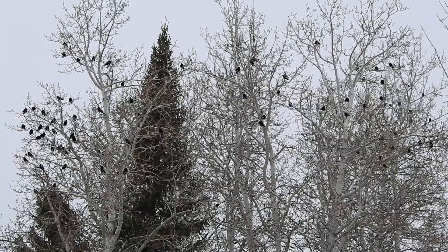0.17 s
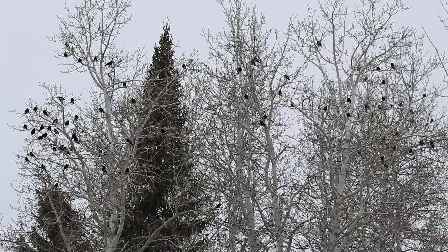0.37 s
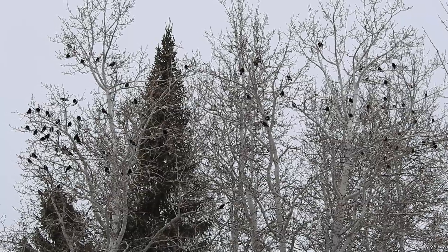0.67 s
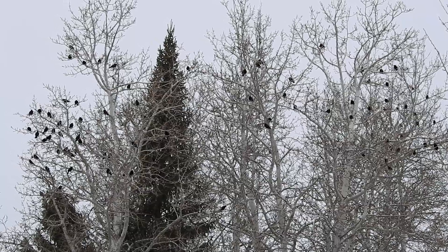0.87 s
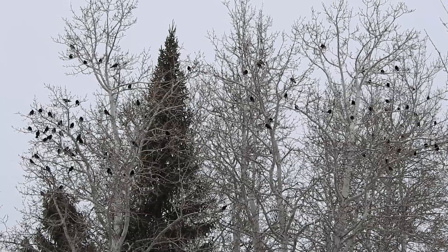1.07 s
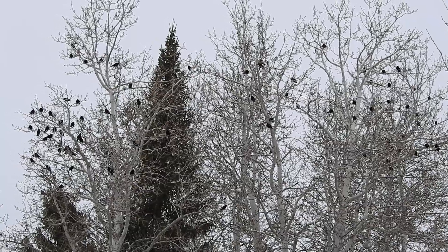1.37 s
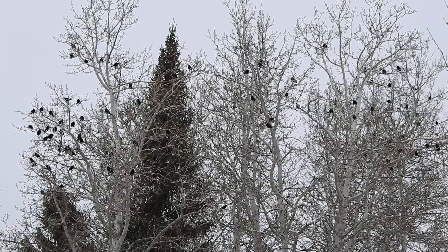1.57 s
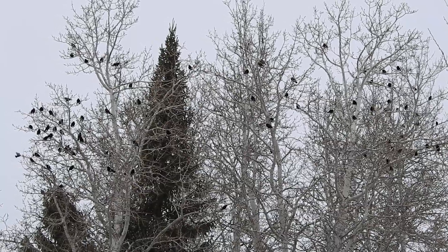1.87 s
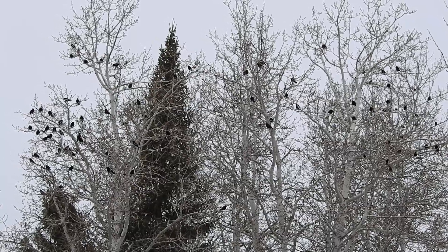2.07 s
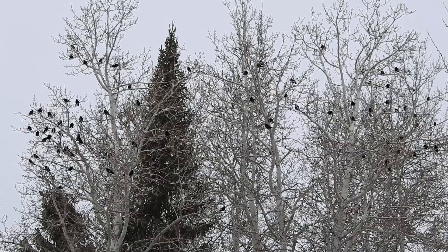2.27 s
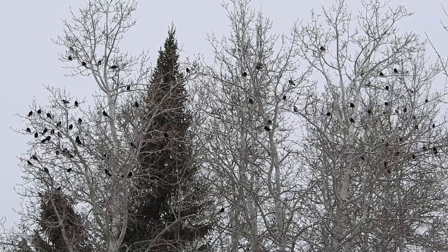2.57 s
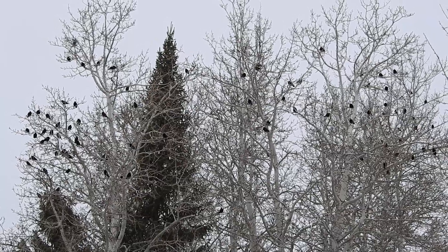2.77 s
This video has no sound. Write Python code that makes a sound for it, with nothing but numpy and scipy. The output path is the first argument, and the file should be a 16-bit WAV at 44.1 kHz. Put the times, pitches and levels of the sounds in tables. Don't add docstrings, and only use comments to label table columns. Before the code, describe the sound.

A dense flock of blackbirds chatters, whistles and trills in bare trees over faint traffic hum.

```python
import sys
import numpy as np
from scipy import signal
from scipy.fft import rfft, irfft
from scipy.io import wavfile
from scipy.ndimage import uniform_filter1d

SR = 44100
rng = np.random.default_rng(int(sys.argv[2]) if len(sys.argv) > 2 else 0)


def amplitude_ratio(level_db):
    exponent = np.asarray(level_db, float) / 20
    return 10 ** exponent


def waveform_to_disk(signal):
    frames = np.transpose(np.atleast_2d(signal))
    scaled = np.clip(frames, -1, 1) * 32767
    samples = np.round(scaled).astype(np.int16)
    wavfile.write(sys.argv[1], SR, samples)


N = 129213

# time_s, pitch_hz, level_db
SLUR_PATHS = [
    [(.267, 6640, -24), (.276, 4623, -27.5), (.305, 3860, -30), (.34, 3445, -33.5), (.42, 3230, -27.5),
     (.45, 3170, -27)],
    [(.326, 4400, -33), (.36, 4130, -25.5), (.42, 3945, -34.5), (.486, 3680, -31), (.567, 3332, -28.5),
     (.70, 3196, -35.5)],
    [(.686, 4820, -26), (.70, 4670, -33.5), (.742, 3076, -26), (.80, 2980, -32)],
    [(.785, 4330, -28), (.825, 3730, -28.5), (.855, 3174, -31), (.905, 3130, -28)],
    [(.905, 3780, -23.5), (.945, 3240, -30), (.986, 2957, -29), (1.06, 2770, -38.5)],
    [(.915, 3600, -35.5), (1.01, 3474, -26), (1.07, 3210, -29), (1.145, 3110, -36.5)],
    [(2.125, 3550, -33), (2.17, 3092, -36), (2.23, 2970, -38), (2.34, 2740, -39.5)],
    [(2.607, 3650, -29), (2.67, 3337, -32.5), (2.76, 3283, -32.5)],
    [(2.644, 5555, -56.5), (2.665, 5680, -26.5), (2.715, 4464, -27), (2.79, 4046, -37), (2.93, 3830, -35)],
    [(2.80, 3860, -32), (2.845, 3050, -36), (2.92, 2920, -33)],
]
# time_s, pitch_hz, level_db
THIN_WHISTLE_PATHS = [
    [(.574, 8290, -51), (.70, 7700, -49), (.83, 7040, -50)],
    [(.85, 7760, -57), (.89, 7050, -47), (.93, 7880, -48)],
    [(1.225, 6370, -57), (1.26, 7060, -46), (1.325, 7440, -37.5)],
    [(1.328, 6800, -39), (1.365, 7650, -41), (1.49, 7770, -37), (1.515, 8080, -45)],
    [(1.56, 7270, -60), (1.62, 7480, -47), (1.69, 7100, -56)],
    [(2.02, 7030, -41.5), (2.16, 7510, -41), (2.297, 7930, -47)],
    [(2.794, 6250, -40), (2.86, 7310, -41), (2.93, 7460, -39)],
]
# start_s, length_s, from_hz, to_hz, level_db
PIPED_NOTES = [(.088, .04, 1566, 1467, -41), (.137, 0.064, 1380, 1335, -44),
               (0.229, 0.035, 2356, 2296, -34), (0.3, 0.14, 1408, 1410, -42.5),
               (0.36, .12, 1702, 1690, -46), (0.236, .055, 1376, 1274, -47),
               (0.701, 0.068, 1370, 1323, -46.5), (0.801, 0.046, 1280, 1287, -48.5),
               (0.711, 0.021, 2030, 2190, -35.5), (.905, 0.04, 1393, 1372, -46),
               (.963, .03, 2270, 2040, -32), (1.0, 0.095, 2150, 2180, -34), (1.071, 0.045, 1440, 1420, -48),
               (1.125, 0.049, 1510, 1580, -47.5), (1.188, 0.023, 2277, 2400, -33.5),
               (1.298, .11, 1430, 1353, -49), (1.354, 0.038, 1604, 1580, -46.5),
               (1.408, 0.065, 2233, 2167, -39), (1.474, .02, 2220, 2300, -44),
               (1.735, .05, 1345, 1444, -47.5), (1.794, 0.034, 1880, 1864, -41),
               (1.835, .10, 1920, 1910, -50), (1.96, 0.015, 2227, 2166, -31),
               (1.986, 0.027, 1767, 1890, -38.5), (2.167, 0.088, 1685, 1630, -44.5),
               (2.229, 0.12, 1290, 1318, -48), (2.234, .11, 1020, 1042, -47.5),
               (2.30, .02, 2140, 2180, -39), (2.421, 0.04, 2123, 2160, -37),
               (2.487, 0.024, 2096, 2130, -35.5), (2.437, 0.04, 1677, 1714, -43),
               (2.548, 0.085, 1355, 1438, -43), (2.714, .018, 2260, 2250, -30),
               (2.812, .02, 1834, 1850, -37.5), (2.82, 0.033, 1654, 1684, -43.5)]
# start_s, length_s, from_hz, to_hz, level_db
SHORT_CHIRPS = [(0.063, 0.017, 4530, 4630, -26.5), (0.186, 0.0094, 3255, 3320, -30),
                (.11, 0.027, 3120, 3360, -35), (.25, 0.015, 3085, 3190, -29),
                (.082, 0.0073, 3500, 3330, -25.5), (.054, .17, 4990, 4900, -41.5),
                (.065, 0.13, 2480, 2567, -41.5), (.11, .017, 6440, 6470, -43),
                (0.676, 0.011, 6000, 6070, -28.5), (.722, 0.0088, 4720, 4640, -23),
                (0.76, 0.007, 4740, 4700, -25), (1.16, 0.052, 2750, 2776, -39),
                (1.256, 0.012, 3170, 3020, -29.5), (1.85, 0.073, 5696, 5750, -41),
                (2.03, 0.028, 3750, 3440, -29.5), (2.05, 0.057, 3200, 2980, -35),
                (2.455, .035, 3500, 3150, -35), (2.608, 0.012, 4740, 4760, -31)]
# start_s, length_s, pitch_hz, level_db
TRILL_RUNS = [
    (0.056, 0.073, 4900, -27.5),
    (0.642, .03, 4670, -32.5),
    (1.122, 0.53, 4700, -34.5),
]
# start_s, peak_db, pitch_hz
NEAREST_TRILL_NOTES = [(1.9809, -21.5, 4840), (2.0055, -16.5, 4600), (2.0246, -19, 4620),
                       (2.0494, -21, 4700), (2.0646, -21, 4710), (2.117, -20, 5210), (2.139, -22, 4830),
                       (2.1625, -20.5, 4970), (2.1874, -22, 5000), (2.2125, -19, 4770),
                       (2.239, -17.5, 4690), (2.265, -17, 4670), (2.2932, -20, 4700), (2.3204, -16.5, 4720),
                       (2.3491, -25, 4960), (2.3614, -22, 4840), (2.3774, -31, 4970), (2.4039, -27, 4830),
                       (2.4296, -22, 4810), (2.4842, -21, 4720)]
# start_s, length_s, top_hz, level_db
ARCHED_CHIRPS = [
    (0.786, 0.038, 5820, -34),
    (.812, .014, 5750, -40),
    (0.92, 0.019, 5680, -25.5),
    (0.949, 0.013, 5670, -34),
    (0.995, 0.025, 5680, -31.5),
    (1.028, 0.013, 5100, -33),
]
# start_s, pitch_hz, level_db
HARSH_CHUCKS = [
    (1.544, 3530, -26),
    (1.692, 3550, -29.5),
    (1.839, 3460, -28),
    (1.995, 7230, -42.5),
]
# middle_s, top_hz
QUICK_TICKS = [(0.162, 6000), (0.43, 7550), (0.759, 6400), (0.89, 5900), (0.911, 7730), (1.008, 5900),
               (1.525, 6030), (1.649, 6070), (1.031, 5870), (2.09, 6700), (2.255, 6720), (2.354, 6340),
               (2.478, 7100), (2.53, 6900), (2.73, 5900), (2.777, 5860)]
# pitch_hz, level_db
AIR_LOSS = [(11500, 0), (15000, -16)]
# pitch_hz, level_db (per Hz)
FLOCK_COLOUR = [(900, -20), (1830, -11.5), (2550, -3.5), (3150, 2), (3920, -4), (4760, -2.5), (6470, -10.5),
                (8700, -33), (12000, -87.5)]
# time_s, level_db
FLOCK_EFFORT = [
    (0.062, -30.5),
    (0.501, -27.5),
    (0.949, -24.5),
    (1.2, -30.5),
    (1.8, -29.5),
    (2.049, -27.5),
    (2.551, -29),
    (2.92, -26),
]
# pitch_hz, level_db (per Hz)
TRAFFIC_COLOUR = [(30, -50), (48, -11.5), (80, -8.5), (213, 0.5), (635, -7.5), (1300, -18.5), (2600, -49.5)]
# pitch_hz, level_db (per Hz)
HISS_COLOUR = [(9000, -5.5), (16000, -24)]
# pitch_hz, level_db (side minus middle)
STEREO_WIDTH = [(60, -10.5), (210, -25), (720, -14.5), (2470, -13), (12000, -0.5)]

EDGE_S = 0.006
TICK_S = 0.0055


def near_birds():
    mix = np.zeros((2, N))
    slurs(mix)
    pipes_and_chirps(mix)
    trills(mix)
    nearest_trill(mix)
    arches(mix)
    chucks(mix)
    for middle_s, top_hz in QUICK_TICKS:
        add(mix, middle_s - TICK_S, tick(top_hz, -31.5))
    return colour(mix, AIR_LOSS)


def slurs(mix):
    for path in SLUR_PATHS + THIN_WHISTLE_PATHS:
        time_s, hz, db = np.transpose(path)
        t = np.arange(time_s[0], time_s[-1] + EDGE_S, 1 / SR)
        pitch = uniform_filter1d(np.interp(t, time_s, hz), size=300, mode="nearest")
        has_overtones = hz[0] < 6650 and hz[-1] < 5000
        add(mix, time_s[0] - EDGE_S / 2, whistle(pitch, np.interp(t, time_s, db), has_overtones))


def pipes_and_chirps(mix):
    for start_s, length_s, from_hz, to_hz, db in PIPED_NOTES + SHORT_CHIRPS:
        add(mix, start_s - EDGE_S / 2, note(length_s, from_hz, to_hz, db))


def trills(mix):
    beats_per_s, open_share = 36.4, 0.62
    for start_s, length_s, hz, db in TRILL_RUNS:
        which, beat = np.divmod(np.arange(0, length_s, 1 / SR) * beats_per_s, 1)
        shift, slant, size = rng.standard_normal((20, 3))[which.astype(int)].T
        gate = np.sin(np.pi * np.clip(beat / open_share, 0, 1))
        pitch = hz * (1 + 0.012 * shift + 0.07 * slant * (beat / open_share - 0.5))
        add(mix, start_s, gate * whistle(pitch, db + 0.5 + 2 * size))


def nearest_trill(mix):
    slants = 0.038 * rng.uniform(-1.1, 1, len(NEAREST_TRILL_NOTES))
    for (start_s, peak_db, hz), slant in zip(NEAREST_TRILL_NOTES, slants):
        sound = note(0.011, hz * (1 - slant), hz * (1 + slant), peak_db - 8)
        add(mix, start_s - EDGE_S / 2, sound)


def arches(mix):
    top_at, drop = 0.3, 0.11
    for start_s, length_s, top_hz, db in ARCHED_CHIRPS:
        u = np.linspace(0, 1, int((length_s + EDGE_S) * SR))
        pitch = top_hz * (1 - drop * ((u - top_at) / (1 - top_at)) ** 2)
        add(mix, start_s - EDGE_S / 2, whistle(pitch, db))


def chucks(mix):
    for start_s, hz, db in HARSH_CHUCKS:
        rise = np.linspace(0.96, 1.02, int((0.018 + EDGE_S) * SR))
        add(mix, start_s - EDGE_S / 2, whistle(hz * rise, db, rich=1))
        bright_noise = np.diff(rng.standard_normal(1402), 2)
        add(mix, start_s - EDGE_S, amplitude_ratio(-58) * np.hanning(1400) * bright_noise)


def tick(hz, db):
    n = int(2 * TICK_S * SR)
    pitch = np.geomspace(hz, 0.7 * hz, n)
    return np.hanning(n) * amplitude_ratio(db + 3.0) * np.sin(2 * np.pi * np.cumsum(pitch) / SR)


def note(length_s, from_hz, to_hz, db):
    return whistle(np.linspace(from_hz, to_hz, int((length_s + EDGE_S) * SR)), db)


def whistle(hz, db, rich=0):
    n, t = len(hz), np.arange(len(hz)) / SR
    knots = rng.standard_normal((2, 80))
    waver, flutter = (np.interp(t, np.arange(80) * 0.0081, k) for k in knots)
    phase = 2 * np.pi * np.cumsum(hz * (1 + 0.001 * waver)) / SR
    ends = np.sin(np.pi / 2 * np.clip(np.minimum(t, t[-1] - t) / EDGE_S, 0, 1)) ** 2
    overtones = amplitude_ratio(-36) * np.sin(2 * phase) + amplitude_ratio(-45) * np.sin(3 * phase)
    tone = np.sin(phase) + rich * overtones
    return np.sqrt(2) * ends * amplitude_ratio(db + 2.5 * flutter) * tone


def flock(count=2100):
    mix = np.zeros((2, N))
    for when, pitch, size, span, bend, kind in rng.random((count, 6)):
        start_s = when * N / SR
        hz = 1100 * 7.5 ** pitch
        length_s = 0.003 + 0.033 * span ** 4
        db = -4 * np.log(size + 0.055)
        fall = 1 + (0.05 - 0.2 * bend ** 2) * min(hz / 3000, 1) ** 3
        if kind < 0.33 and hz > 2600:
            direction = 1 if bend < 0.6 else -1
            sound = tick(hz, db)[::direction]
        elif kind > 0.94:
            sound = amplitude_ratio(db + 8.5) * np.hanning(300) * rng.standard_normal(300)
        else:
            length_s *= min(1700 / hz, 1) ** 1.14
            sound = note(length_s, hz / fall ** 0.5, hz * fall ** 0.5, db)
        add(mix, start_s, sound)
    mix = mix + amplitude_ratio(-1) * trees(mix[0])
    power = uniform_filter1d(abs(rfft(mix[0])) ** 2, size=2500)
    flat = irfft(rfft(mix) / np.sqrt(power + 1e3), N)
    chatter = evened(colour(flat, FLOCK_COLOUR))
    both = amplitude_ratio(-4.5) * chatter + amplitude_ratio(-6) * blur()
    return both * amplitude_ratio(np.interp(np.arange(N) / SR, *np.transpose(FLOCK_EFFORT)))


def blur():
    hz, t, z = signal.stft(rng.standard_normal((2, N)), SR, nperseg=512)
    a, b = rng.standard_normal((2,) + z.shape[1:])
    bands = evened(uniform_filter1d(uniform_filter1d(a, size=2, axis=0), size=30, axis=1))
    bursts = evened(uniform_filter1d(uniform_filter1d(b, size=30, axis=0), size=3, axis=1))
    treble = np.minimum(hz / 6000, 1)[:, None]
    z = z * amplitude_ratio(4 * bands + 4.5 * bursts * treble)
    noise = signal.istft(z, SR, nperseg=512)[1][:, :N]
    return evened(colour(noise, FLOCK_COLOUR))


def trees(x):
    decay_s = 0.3
    taps = np.zeros((2, 30000))
    at = np.arange(300, 29980, 20) + rng.integers(0, 20, (2, 1484))
    np.put_along_axis(taps, at, rng.choice([-1., 1.], at.shape), 1)
    taps *= amplitude_ratio(-60 * np.arange(30000) / SR / decay_s)
    return signal.fftconvolve(x[None], taps / np.linalg.norm(taps[0]), axes=1)[:, :N]


def traffic_and_hiss():
    hum = evened(colour(rng.standard_normal((2, N)), TRAFFIC_COLOUR))
    hiss = evened(colour(rng.standard_normal((2, N)), HISS_COLOUR))
    return amplitude_ratio(-40) * hum + amplitude_ratio(-62) * hiss


def read(points, hz):
    f, value = np.transpose(points)
    return np.interp(np.log(hz + 1), np.log(f + 1), value)


def evened(x):
    return x / np.sqrt(np.mean(x ** 2) + 1e-20)


def colour(x, points):
    return irfft(rfft(x) * amplitude_ratio(read(points, np.fft.rfftfreq(N, 1 / SR))), N)


def add(mix, start_s, sound):
    part = mix[:, max(round(start_s * SR), 0):][:, :len(sound)]
    part += np.array([[1], [rng.uniform(-0.86, 1.61)]]) * sound[:part.shape[1]]


def scene():
    near = near_birds()
    near = near * [[1], [0.72]] + amplitude_ratio(-9.5) * trees(near[0])
    mid, side = near + flock() + traffic_and_hiss()
    side_turn = np.exp(1.7j)
    side = irfft(rfft(colour(side, STEREO_WIDTH)) * side_turn, N)
    return np.array([1.08 * mid + side, mid / 0.96 - side])


def roll_off(x):
    return signal.sosfilt(signal.butter(12, 15740, fs=SR, output="sos"), x)


def record(dry):
    start_s, fade_s = 0.045, 0.011
    t = np.arange(N) / SR
    mix = dry * np.clip((t - start_s) / fade_s, 0, 1)
    return roll_off(mix)


dry = scene()
out = record(dry)
waveform_to_disk(out)
```